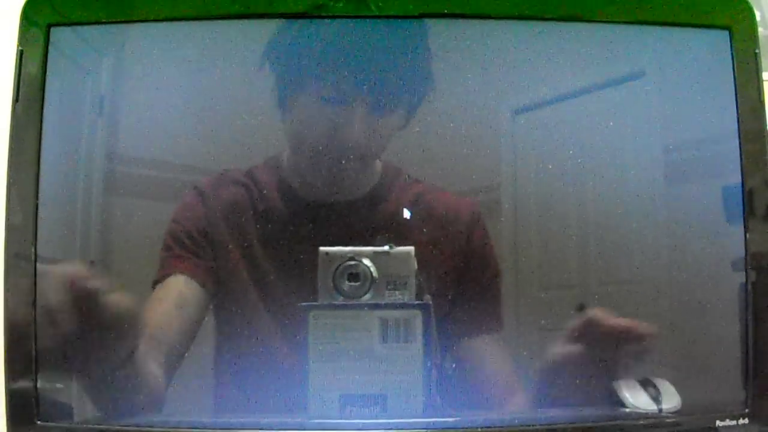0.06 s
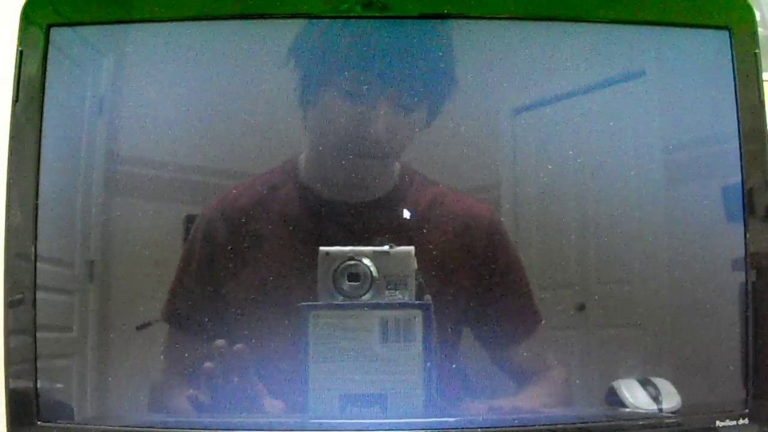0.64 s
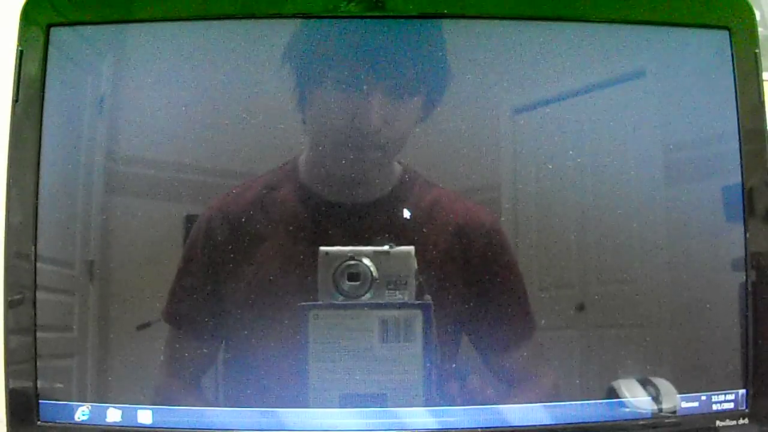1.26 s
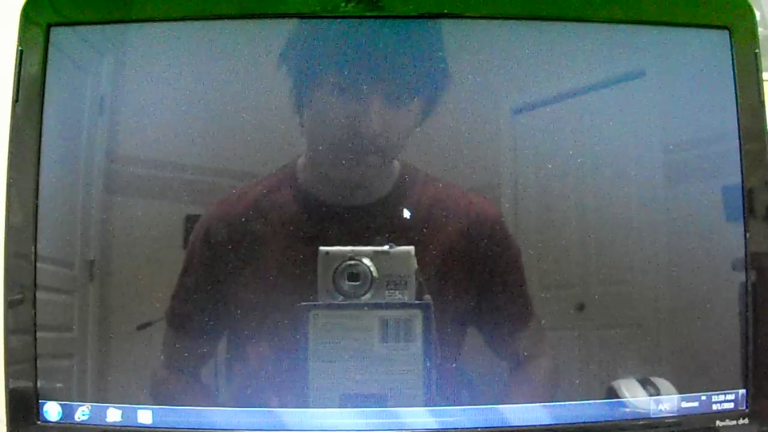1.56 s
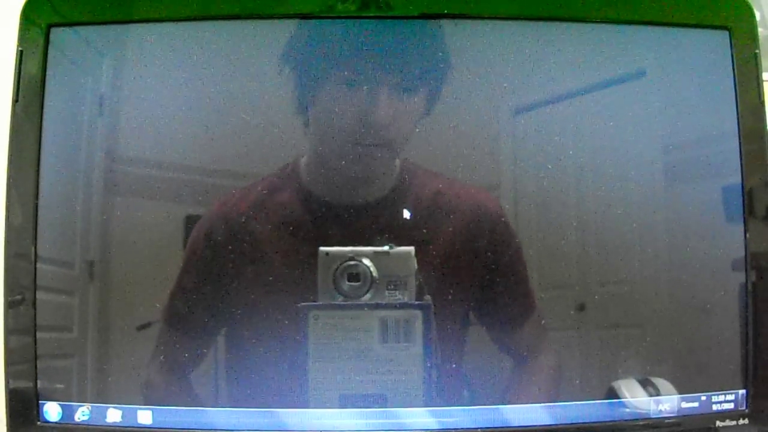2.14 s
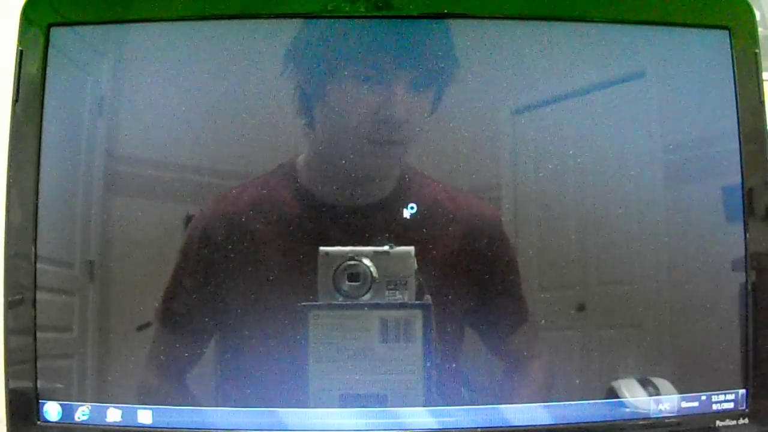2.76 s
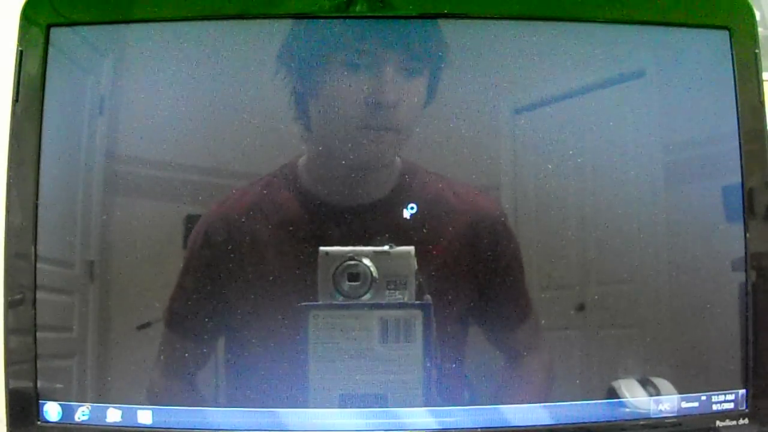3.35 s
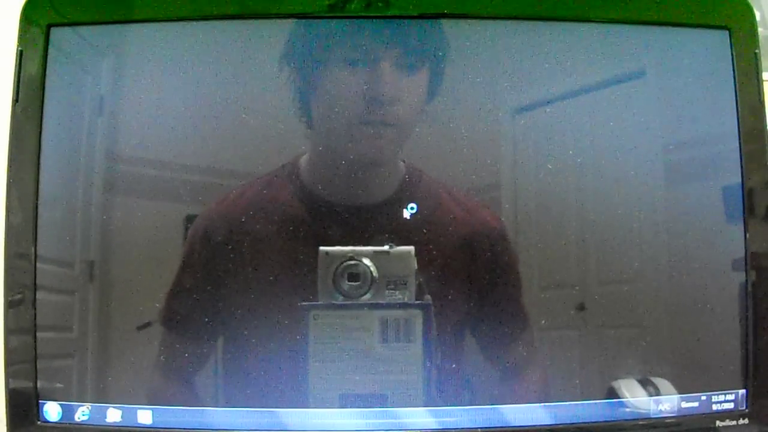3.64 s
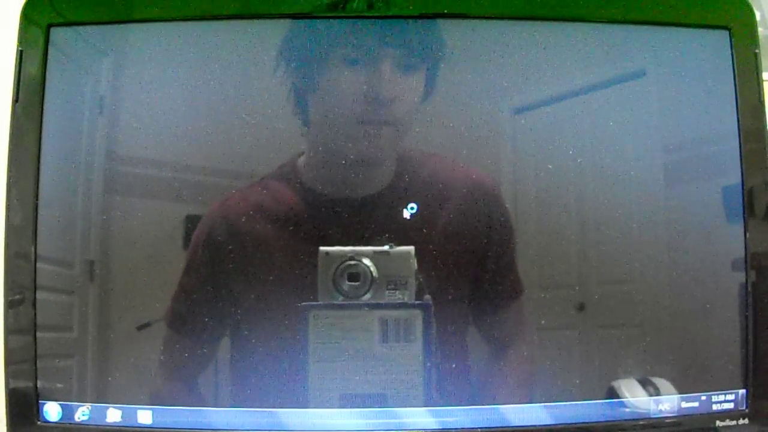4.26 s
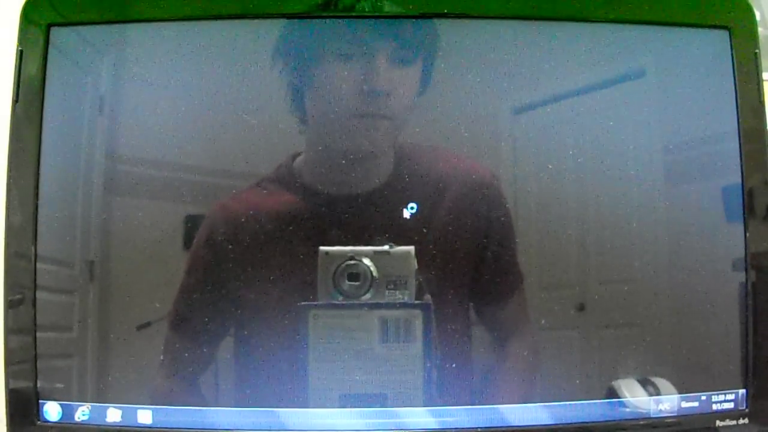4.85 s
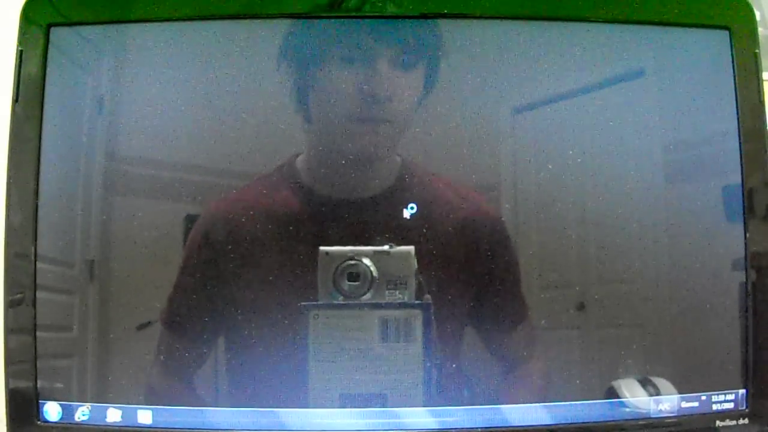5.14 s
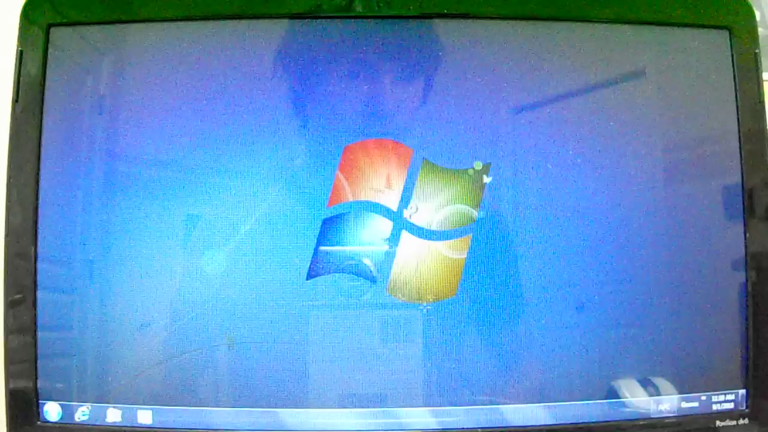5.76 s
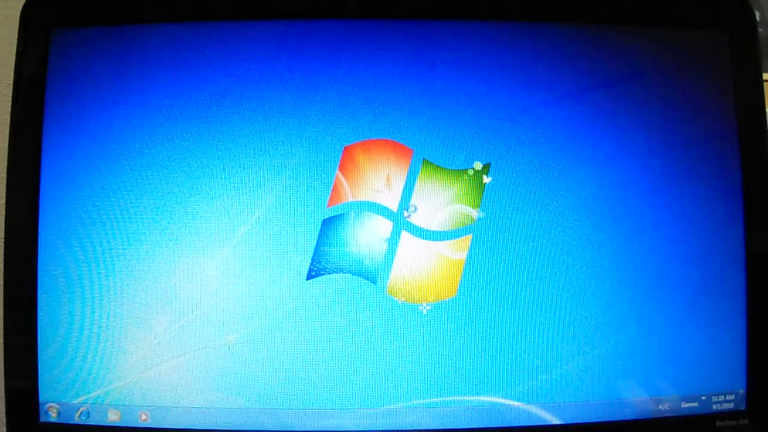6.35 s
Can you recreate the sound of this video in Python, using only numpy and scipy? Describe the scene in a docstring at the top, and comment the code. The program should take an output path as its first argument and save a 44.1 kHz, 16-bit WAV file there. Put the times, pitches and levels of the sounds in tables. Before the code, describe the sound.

Hands settle on a hard desk with a few dull bumps and one hollow knock. Then fingers drum loosely on the top, firm knocking taps alternating with light clicking touches in an uneven rhythm. The room is small and quiet, with a brief echo and a faint computer fan hum under soft hiss. A small camera microphone picks it up from nearby.

```python
"""Fingers drum loosely on a hard desk in a small, quiet room, firm taps alternating with light touches.
Each tap thuds, knocks and clacks in the desk's modes and clicks at the fingertip. Before the drumming,
the hands settle with a few dull bumps and one hollow knock. The walls answer briefly, and a computer
fan hums faintly under a soft hiss. The camera's gain control ducks after the hardest blows and
slowly recovers."""
import sys
import numpy as np
from scipy import signal
from scipy.fft import rfft, irfft, next_fast_len
from scipy.io import wavfile
from scipy.ndimage import uniform_filter1d

SR = 44100
rng = np.random.default_rng(int(sys.argv[2]) if len(sys.argv) > 2 else 0)


def int16_out(signal):
    """Quantize to a 16-bit WAV file."""
    q = np.round(np.clip(np.atleast_2d(signal).T, -1, 1) * 32767)
    wavfile.write(sys.argv[1], SR, q.astype(np.int16))


N = 286650
LONG, SHORT = SR // 2, SR // 20  # buffers for tails and for taps [samples]

# fan air and hiss: (frequency [Hz], level per Hz [dB])
FAN_AIR = [(20, 12), (40, -9), (68, -2.5), (140, -6), (280, 0.5), (700, -2), (900, 0.5), (1350, -0.5),
           (1600, -5.5), (3300, -7.5), (6000, -11), (10000, -14)]
# the fan's faint tones: (frequency [Hz], level against the air [dB])
FAN_TONES = [(178, -22), (298, -29), (840, -24.5), (903, -18), (1237, -32)]
# the room's low rumble: (frequency [Hz], level per Hz [dB])
ROOM_RUMBLE = [(15, 5), (35, -1), (70, -7), (120, -41), (300, -48), (1000, -90)]
# the rumble's slow wobble in level: (rate [Hz], level per Hz [dB])
RUMBLE_SWELL = [(1, 0.5), (6, -4.5), (14, -33.5), (60, -120)]
# soft bumps of the hands: (time [s], level [dB])
HAND_BUMPS = [(0.5624, -27), (0.613, -36), (0.8464, -29.5), (1.0803, -21), (1.2752, -24)]
# the desk's modes, all six tables: (frequency [Hz], level [dB], t60 [s])
SWAY_MODES = [(76.7, -3, 0.1404), (112.8, -4, 0.0702), (188, -13.5, 0.096)]  # low sway under the hands
HOLLOW_MODES = [(79.8, -11, 0.067), (182.5, -25.5, 0.55), (222, -14, 0.22), (255, -6, 0.075),
                (389, -17, 0.15), (409, -1.5, 0.1), (452, -6, 0.0257), (609, -7, 0.079), (664, -1.5, 0.065),
                (791.6, -4.5, 0.0392), (1216, -8.5, 0.0246), (1985, -14.5, .02)]  # ring of the hollow knock
THUD_MODES = [(82, -1, 0.032), (190, -2.5, 0.0387)]  # low push, damped by the finger itself
KNOCK_MODES = [(361.8, -3, 0.0236), (429, 2, 0.01888), (574.3, 7.5, 0.01383), (699.2, -7, 0.0365),
               (794.4, -1, 0.02476)]  # bending of the top
CLACK_MODES = [(947, -0.5, 0.0365), (1143.8, 5, 0.02488), (1237.5, -1.5, 0.0291), (1392.8, -8, 0.0471),
               (1699.2, -8.5, 0.0386), (2079, 6.5, 0.0179)]  # stiffer modes
CLICK_MODES = [(2627, -6, 0.0137), (3048.5, 3, 0.0093), (3570, -11, 0.033), (3810, -1.5, 0.00525),
               (4625, -3, 0.0114)]  # small, bright modes
# finger taps: (time [s], level [dB], hardness from pad to nail [dB], hand weight [dB], spot pitch [Hz])
FINGER_TAPS = [(1.4587, -35, -8.0, -2, 592), (1.6052, -9.5, -6.5, -9.5, 355.5), (1.69, -28, -7.5, -7, 400),
               (1.9053, -24.5, -5.0, -8, 410), (1.92, -16.0, -1.0, -18, 430), (2.018, -31.0, -4.5, 0, 450),
               (2.1361, -33, -2.5, -5, 490), (2.2475, -18.0, -5.0, -2.5, 453),
               (2.574, -25.5, -8.5, -8, 540), (2.5856, -17.0, -3.0, -10, 617),
               (2.6825, -26.5, -5.0, -7, 520), (2.8042, -33.0, -1.5, -8, 500),
               (2.9235, -18.5, -4.0, -4, 540), (3.0164, -40.5, 5.0, -1, 420), (3.1483, -28, -7.5, -2, 430),
               (3.2372, -35.5, -1.5, -13, 600), (3.3661, -13.5, -9.5, -8, 473),
               (3.442, -29.5, -11.5, -8, 520), (3.662, -16.5, -5.0, -17, 351),
               (3.7835, -23.0, -11.0, -8, 482), (3.8872, -28.5, -2.5, -7.5, 470),
               (4.0073, -14.0, -8.0, -8, 418), (4.095, -36.5, -4.0, -6, 370), (4.2305, -7.0, -9.5, -4, 570),
               (4.3085, -24.0, -2.5, -17, 500), (4.4764, -34.5, -4.0, -6, 580),
               (4.6454, -34.0, -5.5, -2, 400), (4.731, -19.0, -4.5, -0.5, 470),
               (5.175, -10.0, -12.0, -5.5, 440), (5.2697, -28.5, 0.5, -19, 460),
               (5.4903, -22.0, -1.5, -3, 377), (5.597, -27.5, -1.0, -6, 585),
               (5.7052, -30.0, -2.0, -16, 450), (5.8454, -20.5, -0.5, -8.5, 628),
               (5.9346, -31.0, -6.0, -7, 540), (6.0768, -16, -3.5, -3, 665), (6.171, -33.0, -8.0, -9, 550),
               (6.2913, -35.0, -4.0, -8, 630), (6.4051, -16.0, -3.5, -7, 540)]
# fingertip noises, all three tables: (frequency [Hz], level per Hz [dB])
CONTACT_NOISE = [(100, -22), (700, -13.5), (1500, -0.5), (3300, 5.5), (4800, -3), (6500, -12), (10000, -20),
                 (12000, -52)]
CONTACT_GRIT = [(300, -4.5), (1500, 6.5), (3000, -25.5)]  # modulator that makes the contact spiky
PAD_BRUSH = [(150, -78), (450, -1.5), (1300, 19), (2500, 6), (8000, -16)]
# slaps off nearby walls and furniture: (delay [s], level [dB])
WALL_ECHOES = [(0.012, -10.5), (0.0182, -18.5), (.0225, -13.5)]
# colour of the room's answer: (frequency [Hz], gain [dB])
WALL_COLOUR = [(50, -16.5), (200, -10), (350, -12), (580, -11), (740, -3.5), (950, -7.5), (1200, -6),
               (2000, -3), (3500, -2), (9000, 2)]
# length of the room's tail: (frequency [Hz], t60 [s])
ROOM_DECAY = [(100, 0.45), (700, 0.494), (2000, 0.344), (5000, 0.39), (10000, 0.2703)]
# the microphone's treble roll-off: (frequency [Hz], gain [dB])
MIC_TREBLE = [(10200, 1), (11000, -14), (11700, -16), (12300, -26.5)]


def amp(db):
    """Decibels to gain."""
    return 10 ** (np.asarray(db) / 20)


def unit(x):
    """Scale to rms 1."""
    return x / np.sqrt(np.mean(x ** 2) + 1e-20)


def unit_hit(x):
    """Scale a short sound to the energy of 10 ms at rms 1."""
    return x * np.sqrt(SR / 100 / (np.sum(x ** 2) + 1e-20))


def curve_at(points, hz):
    """Read (frequency, value) points on a log frequency axis."""
    freqs, values = np.transpose(points)
    return np.interp(np.log(hz + 1), np.log(freqs + 1), values)


def filtered(x, response):
    """Zero-phase filter; response gives the gain at each frequency."""
    size = next_fast_len(len(x) + SHORT)
    return irfft(rfft(x, size) * response(np.fft.rfftfreq(size, 1 / SR)), size)[:len(x)]


def eq(x, curve):
    """Colour a sound with a curve of (frequency [Hz], gain [dB])."""
    return filtered(x, lambda hz: amp(curve_at(curve, hz)))


def noise(spectrum, size):
    """Coloured noise of rms 1."""
    return unit(eq(rng.standard_normal(size), spectrum))


def add(track, start_s, x):
    """Mix x into the track at start_s."""
    part = track[max(round(start_s * SR), 0):][:len(x)]
    part += x[:len(part)]


def fan_and_rumble(level_db=-38.7, half_width_hz=4):
    """The bed: a computer fan's moving air and faint, unsteady tones over an uneven room rumble."""
    hum = np.zeros(N)
    for hz, db in FAN_TONES:
        tone = filtered(rng.standard_normal(N), lambda f: 1 / (1 + ((f - hz) / half_width_hz) ** 2))
        hum += amp(db) * unit(tone)
    swell_db = 3.4 * noise(RUMBLE_SWELL, N)
    rumble = amp(-8) * unit(noise(ROOM_RUMBLE, N) * amp(swell_db))
    return amp(level_db) * (noise(FAN_AIR, N) + hum + rumble)


def desk_ring(modes, vary_db, detune, attack_s, size=SHORT):
    """Struck modes ring as decaying sines; level and pitch vary a little from hit to hit."""
    t = np.arange(size) / SR
    hz, db, t60 = np.transpose(modes)[:, :, None]
    level_jitter, pitch_jitter = rng.standard_normal((2, len(modes), 1))
    envelopes = amp(db + vary_db * level_jitter - 60 * t / t60)
    sines = np.sin(2 * np.pi * hz * (1 + detune * pitch_jitter) * t)
    return unit_hit((envelopes * sines).sum(0) * (1 - np.exp(-t / attack_s)))


def hand_bumps():
    """The soft heels of the hands only sway the desk: dull, low bumps."""
    out = np.zeros(N)
    for start_s, db in HAND_BUMPS:
        bump = -amp(db) * desk_ring(SWAY_MODES, vary_db=1, detune=.015, attack_s=.003, size=LONG)
        add(out, start_s, bump + room_tail(bump))
    return out


def room_tail(x):
    """The small room's diffuse tail, wet only; it fades in as the nearest wall answers."""
    hz, frame_s, spectrum = signal.stft(rng.standard_normal(LONG), SR, nperseg=256)
    decay = amp(-60 * frame_s / curve_at(ROOM_DECAY, hz)[:, None])
    tail = signal.istft(spectrum * decay, SR, nperseg=256)[1][:LONG]
    t = np.arange(LONG) / SR
    early_lift = 1 + 0.404 * np.exp(-t / 0.0139)  # the first reflections are the strongest
    fade_in = np.clip((t - .003) / 0.0054, 0, 1)
    tail = tail * early_lift * fade_in
    impulse = eq(tail / np.linalg.norm(tail), WALL_COLOUR)
    return signal.fftconvolve(x, impulse)[:LONG]


def hollow_knock(start_s=.8903, level_db=-8.3):
    """One harder blow of the hand rings hollow in the desk, with a little contact noise on top."""
    out = np.zeros(N)
    body = desk_ring(HOLLOW_MODES, vary_db=1, detune=0.0035, attack_s=0.00134, size=LONG)
    skin = amp(-16) * contact(attack_s=0.0035, t60_s=0.041, size=LONG)
    knock = amp(level_db) * (body + skin)
    add(out, start_s, knock + amp(-1) * room_tail(knock))
    return out


def contact(attack_s, t60_s, size=SHORT):
    """A brief burst of spiky noise as skin and nail meet the surface."""
    t = np.arange(size) / SR
    grit = np.abs(noise(CONTACT_GRIT, size))
    envelope = (1 - np.exp(-t / attack_s)) * amp(-60 * t / t60_s)
    return unit_hit(noise(CONTACT_NOISE, size) * grit * envelope)


def pad_brush(rise_s=0.00215):
    """The soft pad brushes the desk just before the blow: a tiny swell of noise."""
    t = np.arange(SHORT // 8) / SR
    return noise(PAD_BRUSH, len(t)) * np.exp((t - t[-1]) / rise_s)


def struck_spot(modes, centre_hz, focus_db):
    """The struck spot favours modes near one pitch; those an octave away drop by focus_db."""
    return [(hz, db - focus_db * np.log2(hz / centre_hz) ** 2, t60) for hz, db, t60 in modes]


def finger_tap(level_db, hardness_db, weight_db, spot_hz):
    """One finger knocks on the desk top; more weight gives more thud, more nail more clack and click."""
    knock_modes = struck_spot(KNOCK_MODES, spot_hz, focus_db=12)
    clack_modes = struck_spot(CLACK_MODES, centre_hz=1325.4, focus_db=21)
    thud = desk_ring(THUD_MODES, vary_db=1, detune=.02, attack_s=.0003)
    knock = desk_ring(knock_modes, vary_db=1.2, detune=.015, attack_s=.0018)
    clack = desk_ring(clack_modes, vary_db=2, detune=0.02033, attack_s=0.00185)
    bright = desk_ring(CLICK_MODES, vary_db=2, detune=.03, attack_s=.0005)
    click = unit_hit(contact(attack_s=0.004, t60_s=0.0303) + bright / 2)
    nail = amp(1.29) * clack + amp(-1) * click
    return amp(level_db) * (knock + amp(weight_db) * thud + amp(hardness_db) * nail)


def drumming_fingers():
    """Each tap arrives directly and, radiated in several directions, by way of the walls."""
    out = np.zeros(N)
    tail_send = amp(-.5) / np.sqrt(len(WALL_ECHOES))
    for start_s, level_db, *touch in FINGER_TAPS:
        add(out, start_s, finger_tap(level_db, *touch))
        for delay_s, echo_db in WALL_ECHOES:
            radiated = finger_tap(level_db, *touch)  # each direction carries its own mix of modes
            add(out, start_s + delay_s, amp(echo_db) * eq(radiated, WALL_COLOUR))
            add(out, start_s, tail_send * room_tail(radiated))
        brush = amp(level_db - 6.5) * pad_brush()
        add(out, start_s - (len(brush) - 1) / SR, brush)  # swells into the hit
    return out


def gain_control(x, ceiling_db=-14.7, duck_s=0.0066, recover_s=0.679, hold_s_per_db=.092):
    """A hit over the ceiling ducks the gain; it holds, longer if deeper, then creeps up with the hiss."""
    hop = 88  # samples
    step_s = hop / SR
    power = np.abs(uniform_filter1d(x ** 2, SR // 100))[::hop]
    duck_db, hold_s, ducks_db = 0, 0, []
    for excess_db in 10 * np.log10(power + 1e-12) - ceiling_db:
        hold_s -= step_s
        if excess_db > duck_db:
            duck_db, hold_s = excess_db, hold_s_per_db * excess_db
        elif hold_s < 0:
            duck_db *= np.exp(-step_s / recover_s)
        ducks_db.append(duck_db)
    pole = np.exp(-step_s / duck_s)
    smooth_db = signal.lfilter([1 - pole], [1, -pole], ducks_db)
    return x * amp(-np.interp(np.arange(N), np.arange(0, N, hop), smooth_db))


def scene():
    """Fingers and hands on the desk over the fan and rumble, in mono."""
    return (drumming_fingers() + hand_bumps() + hollow_knock() + fan_and_rumble())[None]


def record(dry):
    """A small camera microphone: little deep bass or top end, ducking after hard hits, rounded peaks."""
    low_cut_hz, top_hz, clip_level = 52, 12263, .75
    low_cut = signal.butter(2, low_cut_hz, "high", fs=SR, output="sos")
    sound = eq(signal.sosfilt(low_cut, dry[0]), MIC_TREBLE)
    sound = gain_control(sound)
    sound = sound / (1 + np.abs(sound / clip_level) ** 6) ** (1 / 6)  # soft clip
    return filtered(sound, lambda hz: hz < top_hz)[None]


dry = scene()
out = record(dry)
int16_out(out)
```